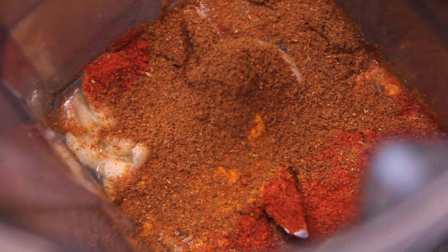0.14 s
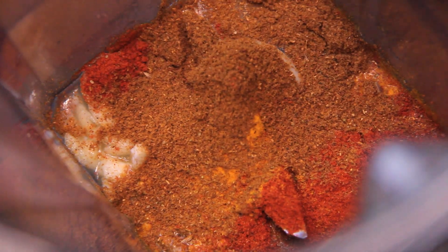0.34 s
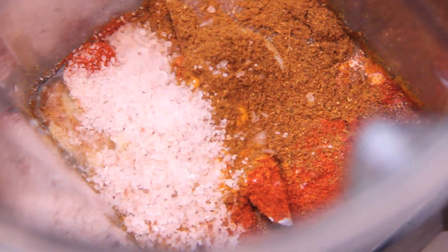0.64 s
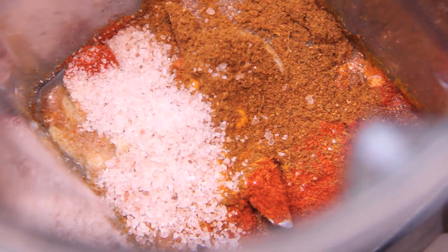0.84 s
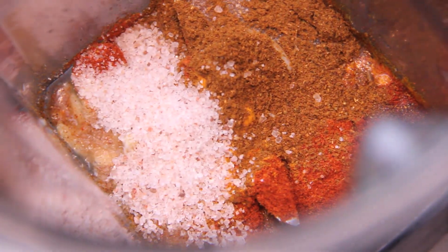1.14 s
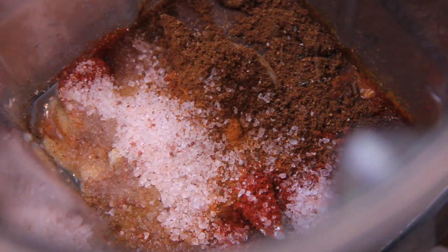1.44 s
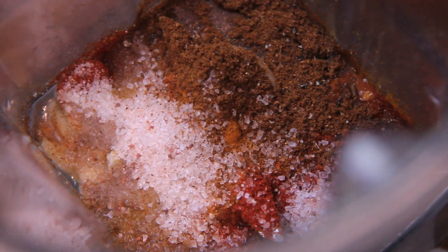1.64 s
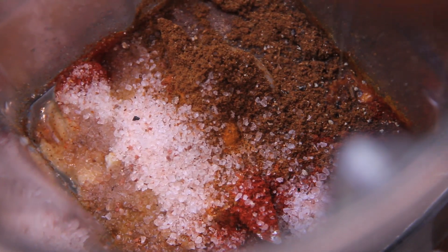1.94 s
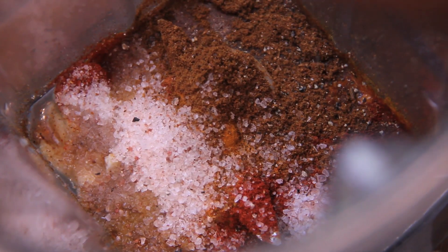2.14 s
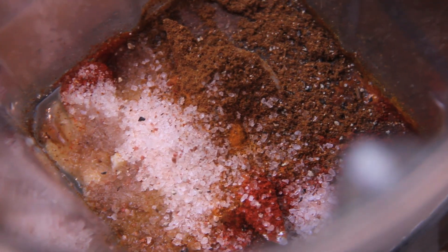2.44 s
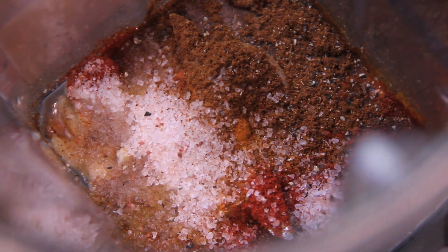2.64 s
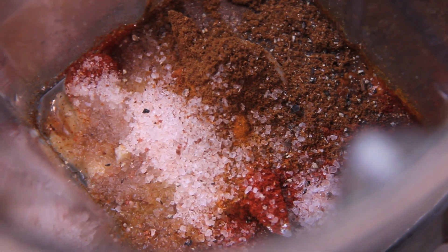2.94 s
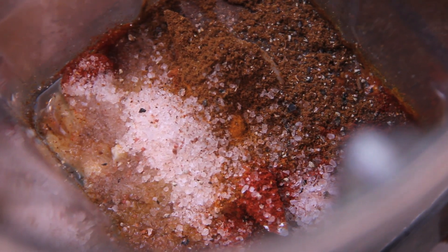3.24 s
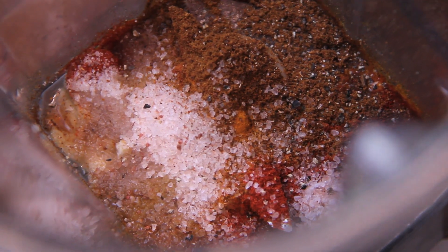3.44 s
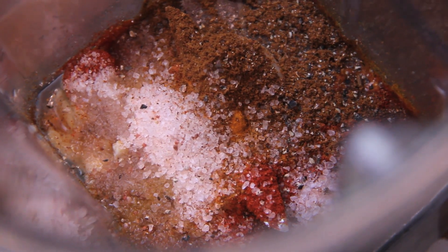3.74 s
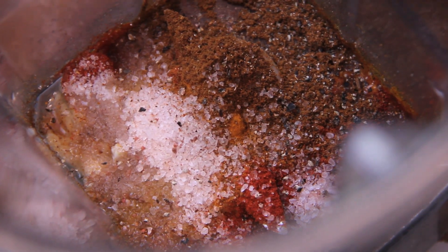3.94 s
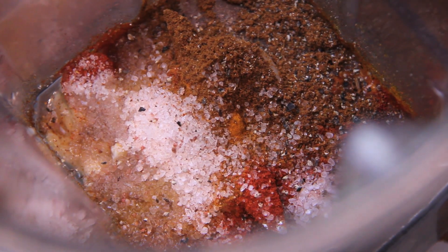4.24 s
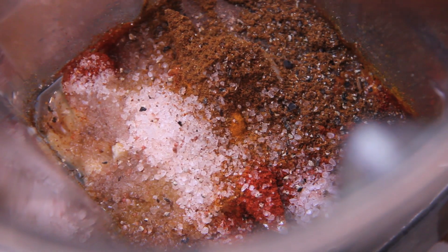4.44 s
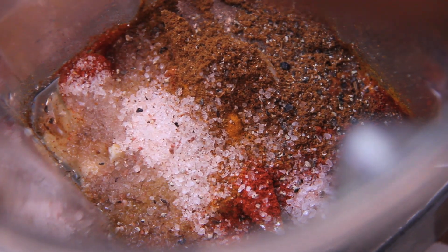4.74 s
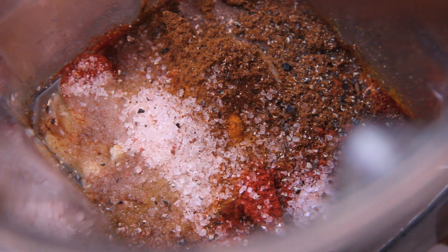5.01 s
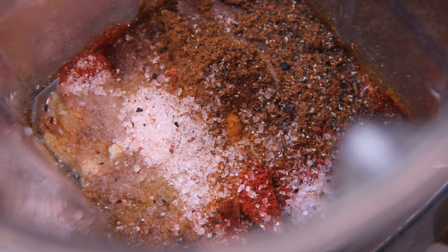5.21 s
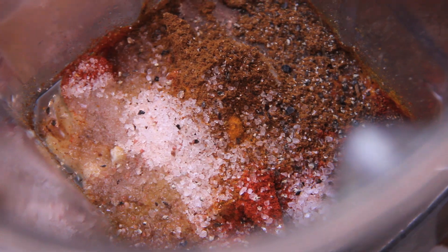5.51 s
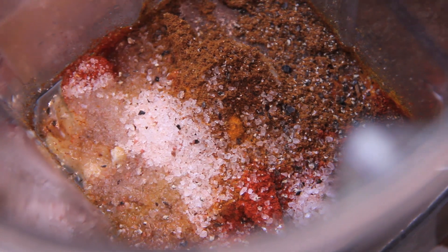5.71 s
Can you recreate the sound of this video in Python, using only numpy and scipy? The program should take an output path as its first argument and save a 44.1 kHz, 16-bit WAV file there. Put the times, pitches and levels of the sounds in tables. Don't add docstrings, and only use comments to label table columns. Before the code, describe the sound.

Close kitchen sounds over quiet, low room noise and a faint appliance hum. A fading glass ring opens, then a spoon taps the half-filled jar at 0.1 s and harder at 0.27 s, each a click followed by a short, dull glassy ring. A hard cut at 0.4 s leads to salt sliding off with a soft hiss around 0.55 s and a small tick at 0.6 s. Around 0.92-1.06 s a metal spoon scrapes and rattles in a bright cluster, ringing thinly. At 1.4 s another abrupt cut brings a much louder hand pepper mill. It grinds until the end near 6 s in short twists, roughly every 0.3 s: gritty crunch, sharp irregular cracks, high flying ticks and low knocks, with brief lulls and soft hand thuds. A faint shaft squeak appears near 3.1 s; the strongest cracks come around 3.8-4.4 s and 5.77 s, with a heavier thud then.

```python
import sys
import numpy as np
from scipy import signal
from scipy.fft import rfft, irfft, next_fast_len
from scipy.io import wavfile
from scipy.ndimage import uniform_filter1d

SR = 44100
rng = np.random.default_rng(int(sys.argv[2]) if len(sys.argv) > 2 else 0)


def transcribe(u):
    v = np.clip(np.atleast_2d(u).T, -1, 1)
    q = np.round(v * 32767).astype(np.int16)
    wavfile.write(sys.argv[1], SR, q)


def volts_from_db(level):
    exponent = np.asarray(level, float) / 20
    return 10 ** exponent


N = 258867
T = np.arange(N) / SR
CUTS_S = (0.405, 1.407)


def unit(x):
    return x / np.sqrt(np.mean(x ** 2) + 1e-20)


def power_db(power):
    return 10 * np.log10(power)


def along(points, hz):
    point_hz, value = np.transpose(points)
    return np.interp(np.log(hz + 1), np.log(point_hz + 1), value)


def curves(rows):
    s, *columns = np.transpose(rows)
    return [np.interp(T, s, column, left=-150, right=-150) for column in columns]


def coloured(x, spectrum, peaks=(), lift_db=0):
    size = 2 * next_fast_len(N // 2 + 4096)
    f = np.fft.rfftfreq(size, 1 / SR)
    bumps = 0
    for hz, width_hz, db in peaks:
        bumps = bumps + volts_from_db(lift_db + db / 2) * width_hz ** 2 / (4 * (f - hz) ** 2 + width_hz ** 2)
    gain = unit(volts_from_db(along(spectrum, f)) * (1 + bumps))
    cepstrum = irfft(np.log(gain + 1e-6), size)
    cepstrum[1:size // 2] *= 2
    cepstrum[size // 2 + 1:] = 0
    return irfft(rfft(x, size) * np.exp(rfft(cepstrum)), size)[:N]


def grit(rate_hz, spread_db, life_ms, smooth):
    size = volts_from_db(spread_db * np.minimum(rng.exponential(size=N), 4))
    hits = (rng.random(N) < rate_hz / SR) * size
    puffs = signal.lfilter([1], [1, -np.exp(-1000 / (life_ms * SR))], hits)
    return unit((unit(puffs) + smooth) * rng.standard_normal(N))


def bursts(times_s, dbs, hold_ms, fall_ms, rise_ms=0.095, spike=0):
    out = np.zeros(N + SR)
    ms = np.arange(SR // 20) * 1000 / SR
    for s, db, hold, rise in np.broadcast(times_s, dbs, hold_ms, rise_ms):
        shape = np.exp(-ms / hold) * np.exp(-np.maximum(ms - hold, 0) / fall_ms)
        shape *= (1 - np.exp(-ms / rise)) * (1 + spike * np.exp(-ms / 0.26))
        out[round(s * SR):][:len(ms)] += volts_from_db(db) * shape * rng.standard_normal(len(ms))
    return out[:N]


def pushes(times_s, dbs):
    out = np.zeros(N)
    out[np.round(times_s * SR).astype(int)] = volts_from_db(dbs)
    return out


def pings(rows, cycles, rough, band_hz):
    out = np.zeros(N + SR)
    t = np.arange(SR // 50) / SR
    for s, db, hz in rows:
        wave = np.sin(2 * np.pi * hz * t) + rough * rng.standard_normal(len(t))
        shape = np.exp(-hz * t / cycles) * (1 - np.exp(-4 * hz * t))
        out[round(s * SR):][:len(t)] += volts_from_db(db) * wave * shape
    return signal.sosfilt(signal.butter(2, band_hz, "bandpass", fs=SR, output="sos"), out[:N])


# (frequency [Hz], t60 [s])
KITCHEN_DECAY = [(200, 0.54), (1000, 0.53), (4000, 0.4), (12000, 0.14)]


def room(x, near_db=12, lead=90):
    out, step = np.zeros(N + 2 * SR), SR // 4
    for i in range(0, N, step):
        hz, t, z = signal.stft(rng.standard_normal(SR // 2), SR, nperseg=256)
        decay = volts_from_db(-60 * t / along(KITCHEN_DECAY, hz)[:, None])
        tail = signal.istft(z * decay, SR, nperseg=256)[1]
        tail *= volts_from_db(near_db * np.exp(-np.arange(len(tail)) / (0.011 * SR)))
        wet = signal.fftconvolve(x[i:i + step], tail / np.linalg.norm(tail))
        out[i + int(lead):][:len(wet)] += wet
    return out[:N]


# (frequency [Hz], density [dB/Hz])
FLOOR_SPECTRUM = [(13, -95), (22, -26), (70, -1), (109, -2.5), (174, -6.5), (194, -1), (347, -4.5),
                  (524, -9.5), (618, -12.5), (1200, -13.5), (1970, -19.5), (6810, -23), (16000, -34.5)]
# (frequency [Hz], level [dB rms])
HUM_TONES = [(209.9, -72.5), (296.1, -71), (484.5, -80), (1200, -77.5)]


def air():
    hum = 0
    for hz, db in HUM_TONES:
        wander = np.cumsum(rng.normal(0, 0.0088, N))
        hum = hum + volts_from_db(db + 1.5) * np.sin(2 * np.pi * hz * T + wander)
    return volts_from_db(-63) * coloured(rng.standard_normal(N), FLOOR_SPECTRUM) + hum


# (time [s], ring level [dB], click level [dB])
SPOON_TAPS = [
    (-.05, -11, -25.5),
    (0.108, -11, -22.5),
    (0.2652, -6.5, -19.5),
]
# (frequency [Hz], level [dB], t60 [s])
JAR_MODES = [(166.7, -32.5, 0.19), (435, -17.5, 0.2), (503, -18, 0.059), (531, -2.5, 0.061),
             (600, -4, 0.034), (666, -14.5, 0.085), (724, -20, 0.11), (1024, -18.5, 0.077),
             (1503, -14, 0.045), (1724, -17.5, .08), (2210, -15, 0.033), (2390, -21, .035)]
# (frequency [Hz], density [dB/Hz])
CLICK_SPECTRUM = [(410, -35), (700, -7.5), (952, -14.5), (1470, -4.5), (2200, -6), (3220, -12), (3850, -22),
                  (4600, -11), (7130, -24.5), (9700, -29.5), (15000, -49)]


def jar():
    early_s = 0.1
    s, ring_db, click_db = np.transpose(SPOON_TAPS)
    click = bursts(s + early_s, click_db + 2.5, hold_ms=7, fall_ms=4.9, rise_ms=0.83)
    click = coloured(click, CLICK_SPECTRUM)
    ring = np.zeros(N)
    for at, db in zip(s + early_s + 0.00221, ring_db):
        t = np.maximum(T - at, 0)
        onset = 1 - np.exp(-t / 0.0044)
        for hz, level_db, t60_s in JAR_MODES:
            ring += volts_from_db(db + level_db - 60 * t / t60_s) * np.sin(2 * np.pi * hz * t) * onset
    out = click + volts_from_db(-11) * room(click, near_db=7) + ring + volts_from_db(-10) * room(ring, near_db=11.5)
    return np.roll(out, -round(early_s * SR))


# (time [s], level [dB])
SALT_LEVEL = [(.52, -77), (.535, -66), (.545, -53), (.578, -59), (.59, -59), (.63, -69), (.72, -76)]
# (frequency [Hz], density [dB/Hz])
SALT_SPECTRUM = [(410, -54), (700, -9), (1230, -8), (2630, -5), (3790, -9), (8880, -9), (16000, -15)]


def salt_hiss():
    grains = grit(4000, 3.6, 0.35, 1.2)
    return coloured(volts_from_db(curves(SALT_LEVEL)[0]) * grains, SALT_SPECTRUM)


# (time [s], peak level [dB])
SPOON_TICKS = [(0.6, -32), (.716, -46), (0.916, -38), (0.9228, -21.5), (0.941, -30), (0.9438, -30),
               (.9465, -33), (0.9501, -25), (.9592, -24), (.9663, -26), (.972, -34), (0.9755, -27),
               (1.006, -29), (1.031, -45), (1.0605, -35)]
# (frequency [Hz], width [Hz], level [dB])
BOWL_MODES = [(6370, 91, 0), (7000, 110, -9), (4120, 120, -8)]
# (frequency [Hz], density [dB/Hz])
DUST_SPECTRUM = [(2500, -38.5), (4500, -5), (6500, 3.5), (9000, 2), (11000, -5.5), (15000, -19),
                 (18000, -40)]


def spoon_ticks():
    s, db = np.transpose(SPOON_TICKS)
    contacts = bursts(s, db - 4.5, hold_ms=0.5, fall_ms=0.6)
    return coloured(contacts, DUST_SPECTRUM, BOWL_MODES, lift_db=18)


# (time [s], peak level [dB])
SPOON_SLIPS = [(.6, -40), (.9155, -41), (.923, -26), (.9411, -25), (.9439, -25), (.9466, -25), (.9503, -24),
               (.9593, -22), (.9617, -31), (.9664, -27), (.9721, -28), (.976, -32), (.9798, -33),
               (1.0067, -35), (1.0605, -41)]


def spoon_slips():
    jolts = -np.convolve(pushes(*np.transpose(SPOON_SLIPS)), np.hanning(15))[:N]
    return jolts - uniform_filter1d(jolts, size=60, origin=25)


# (time [s], level [dB])
RUB_LEVEL = [(.86, -77), (.91, -67), (.925, -44), (.938, -50), (.95, -36.5), (.98, -41.5), (1.055, -51),
             (1.068, -47), (1.15, -75)]
# (frequency [Hz], density [dB/Hz])
SCRAPE_SPECTRUM = [(350, -44), (650, -4), (1250, 3.5), (2200, -4), (3200, -14), (5100, -16), (6600, -12.5),
                   (9400, -20), (16000, -29)]
# (frequency [Hz], width [Hz], level [dB])
HANDLE_MODES = [(10170, 120, 0), (10470, 260, -5), (15400, 100, -14)]


def spoon_scrape():
    rub_db, = curves(RUB_LEVEL)
    ring_db = 1.6 * np.roll(rub_db, round(0.025 * SR)) + 8
    brush_s = 0.862
    brush_db = np.where(T > brush_s, -71 - 90 * (T - brush_s), -150)
    ring_db = np.maximum(ring_db, brush_db)
    rub = coloured(volts_from_db(rub_db - 3) * grit(1200, 2.6, 0.8, 0.5), SCRAPE_SPECTRUM, BOWL_MODES, lift_db=9.5)
    ring = volts_from_db(ring_db + 1.5) * grit(500, 1.6, 0.9, 0.8)
    return rub + coloured(ring, SALT_SPECTRUM, HANDLE_MODES, lift_db=28)


def salt():
    dry = salt_hiss() + spoon_ticks() + spoon_slips() + spoon_scrape()
    return dry + volts_from_db(-10) * room(dry)


# (start [s], rise [s], length [s], effort [dB], last squeeze [dB])
TWISTS = [(1.338, 0.02, 0.22, -31, 3), (1.626, 0.15, 0.24, -33.5, 3), (1.962, 0.021, 0.2, -34, 8.5),
          (2.226, 0.1, .26, -34, 3.5), (2.571, 0.069, 0.2, -33.5, 7.5), (2.857, 0.024, 0.18, -32.5, 2.5),
          (3.101, 0.056, 0.23, -35.5, 6.5), (3.38, 0.07, 0.24, -33, 3.5), (3.653, 0.083, 0.24, -34, 2.5),
          (3.996, 0.0064, 0.18, -31, -3), (4.239, 0.049, 0.23, -35.5, 4), (4.552, 0.015, .22, -33, 4.5),
          (4.841, 0.05, 0.21, -36, 7), (5.1, 0.056, 0.21, -31, 6), (5.334, 0.051, 0.26, -33.5, 4),
          (5.628, 0.056, 0.25, -35, -3)]
# (time [s], level [dB])
BURR_BITES = [(1.49, -33.5), (1.783, -34), (2.06, -35), (2.337, -45.5), (2.635, -39.5), (2.915, -39.5),
              (3.234, -34.5), (3.49, -36.5), (3.775, -38.5), (4.08, -40), (4.38, -39.5), (4.631, -34),
              (4.912, -36), (5.18, -38.5), (5.467, -36), (5.79, -40)]


def twist_levels():
    start, rise, length, effort_db, squeeze_db = np.transpose(TWISTS)[..., None]
    start_db, fall_db_per_s, sag_db_per_s = -19.5, 261, 20
    squeeze_s, squeeze_lead_s = 0.023, 0.014
    since_stop = T - start - length
    drive_db = effort_db + start_db * np.clip(1 - (T - start) / rise, 0, 9)
    drive_db = drive_db - fall_db_per_s * np.maximum(since_stop, 0)
    squeeze_db = squeeze_db * np.exp(-0.5 * ((since_stop + squeeze_lead_s) / squeeze_s) ** 2)
    coarse_db = drive_db - sag_db_per_s * np.clip(T - start - rise, 0, length)
    s, db = np.transpose(BURR_BITES)[..., None]
    away_db = np.maximum(245 * (s - T), 207 * (T - s))
    bite_power = (volts_from_db(db - away_db) ** 2).sum(0)

    def mix(twist_db, bite_db, rest_db):
        power = (volts_from_db(twist_db) ** 2).sum(0) + volts_from_db(bite_db) ** 2 * bite_power
        return power_db(power + volts_from_db(-51 + rest_db) ** 2)

    body_db = mix(1.18 * coarse_db - 16.5, -0.3, -12)
    crush_db = mix(coarse_db + 0.28 + 0.63 * squeeze_db, 3.7, 0.33)
    dust_db = mix(drive_db + 1.5 + squeeze_db, 5.7, -2.9)
    return body_db, crush_db, dust_db


# (frequency [Hz], density [dB/Hz])
BODY_SPECTRUM = [(200, -21), (450, -12), (800, 5.5), (1500, 6), (2200, -52), (4000, -14)]
# (frequency [Hz], density [dB/Hz])
CRUSH_SPECTRUM = [(900, -13), (1600, 2), (2500, 9), (4500, 11.5), (6000, -3.5), (10000, -24)]


def grinding(body_db, crush_db, dust_db):
    coarse = grit(700, 3.3, 1.0, 0.17)
    fine = grit(2100, 4, 0.27, 0.42)
    chips = grit(260, 3, 0.25, 0.05)
    slope_db_per_s = uniform_filter1d(np.gradient(crush_db) * SR, size=900)
    biting = np.clip(slope_db_per_s / 150, 0.15, 1)
    out = coloured(volts_from_db(body_db - 4.5) * coarse, BODY_SPECTRUM)
    out += coloured(volts_from_db(crush_db - 3.5) * (0.45 * coarse + 0.79 * fine), CRUSH_SPECTRUM)
    out += coloured(volts_from_db(dust_db - 2.5) * (0.34 * coarse + 0.83 * fine), DUST_SPECTRUM)
    return out + coloured(volts_from_db(crush_db - 4.5) * biting * chips, DUST_SPECTRUM)


# (time [s], peak level [dB])
REGRIPS = [(1.398, -34), (1.678, -36), (1.983, -40), (2.615, -61), (2.852, -32), (3.227, -58), (3.414, -41),
           (3.482, -68), (3.987, -32), (4.282, -34.5), (4.367, -45), (4.554, -37.5), (4.848, -30.5),
           (5.111, -36.5), (5.768, -18)]
# (frequency [Hz], density [dB/Hz])
THUD_SPECTRUM = [(30, -20), (70, -9), (130, 0), (300, -1.5), (600, -4), (1500, -34), (6000, -62)]


def hand_thuds():
    s, db = np.transpose(REGRIPS)
    soft = np.convolve(pushes(s + 0.00648, db - 19.5), np.hanning(70))[:N]
    return coloured(soft, THUD_SPECTRUM)


# (time [s], level [dB], pitch [Hz])
SHARDS = [(1.4157, -15, 5400), (1.462, -14, 5300), (1.5067, -21, 6600), (1.5285, -10, 4800),
          (1.5337, -19, 5700), (1.783, -10, 5740), (1.815, -17, 5800), (1.9655, -31, 5400),
          (2.0793, -19, 6900), (2.125, -16, 5270), (2.1577, -13, 7200), (2.2633, -37, 6470),
          (2.3485, -26, 5500), (2.439, -6, 8300), (2.5608, -25, 6100), (2.5954, -29, 5200),
          (2.7823, -8, 6600), (3.0003, -18, 6000), (3.2045, -9, 6570), (3.3397, -9, 7600),
          (3.4039, -29, 8200), (3.4415, -23, 7400), (3.4941, -16, 5900), (3.5362, -20, 5600),
          (3.5555, -1, 4330), (3.5921, -24, 6800), (3.609, -20, 7000), (3.7211, -28, 6000),
          (3.8037, -16, 4370), (4.0098, -24, 6000), (4.0241, -10, 5100), (4.1143, -16, 6800),
          (4.1716, -11, 6960), (4.3038, -29, 7200), (4.3359, -16, 4800), (4.3771, -16, 6000),
          (4.4381, -24, 7000), (4.4579, -19, 6840), (4.463, -16, 6400), (4.4779, -25, 7800),
          (4.6115, -9, 6200), (4.6494, -19, 4460), (4.6629, -24, 4100), (4.7629, -13, 7100),
          (4.909, -18, 8200), (4.9168, -2, 4640), (5.014, -18, 6800), (5.1244, -31, 6300),
          (5.1341, -27, 6940), (5.1871, -9, 4700), (5.3098, -15, 6300), (5.3796, -17, 8140),
          (5.4023, -26, 6300), (5.4363, -14, 7500), (5.5201, -18, 5400), (5.5498, -22, 8100),
          (5.564, -15, 5300), (5.7701, -16, 4700), (5.7994, -16, 4480), (5.8127, -16, 5900)]
# (time [s], level [dB], pitch [Hz])
INNER_KNOCKS = [(1.462, -44, 905), (1.993, -38.5, 940), (2.348, -34, 840), (2.527, -33.5, 1120),
                (3.12, -41, 910), (3.374, -38, 900), (3.4865, -26, 900), (3.551, -41, 1800),
                (3.771, -39, 790), (4.0675, -26.5, 572), (4.372, -18.5, 850), (3.976, -42, 700),
                (4.832, -43, 750), (4.843, -45, 850), (4.855, -33, 1410), (5.249, -41.5, 806),
                (5.359, -42, 800), (5.504, -27.5, 900), (5.635, -50, 600), (5.727, -33, 1050),
                (5.811, -22, 1230)]


def shards_and_knocks():
    high = pings(SHARDS, cycles=1.3, rough=0.31, band_hz=(2800, 10500))
    low = pings(INNER_KNOCKS, cycles=1.23, rough=0.37, band_hz=(450, 2600))
    return volts_from_db(2.5) * high + volts_from_db(5) * low


# (time [s], snap level [dB], knock level [dB], length [ms])
WHOLE_CORNS = [(1.481, -6, -17.5, 3.5), (1.4855, -22, -18.5, 3.5), (1.5283, -14, -25, 9.5),
               (1.532, -16, -31, 2.3), (1.783, -23, -26, 3.4), (2.0773, -23, -32, 3),
               (2.335, -27, -29.5, 3.8), (2.3943, -21.5, -31, 6.6), (2.6254, -6, -13, 3.8),
               (2.9058, -20.5, -19.5, 4.1), (2.93, -16.5, -25, 6.2), (3.2309, -9.5, -14, 1.2),
               (3.2436, -3.5, -14, 3.2), (3.4859, -5.5, -14.5, 6.6), (3.501, -20, -48, 2.9),
               (3.535, -14, -27, 3.9), (3.5499, -4, -16.5, 5.7), (3.7717, -19, -23, 2.6),
               (3.783, -0.5, -13, 2.45), (4.0669, -0.5, -15.5, 2.4), (4.079, -24, -25, 4.9),
               (4.336, 2.5, -17.5, 0.37), (4.3718, -4.5, -13, 2.1), (4.405, -10.5, -25, 3.1),
               (4.6566, -9.5, -21.5, 4.1), (4.9163, -7.5, -19.5, 2.3), (5.1704, -14.5, -23, 3.7),
               (5.4536, -15, -22.5, 4.5), (5.4725, -16, -24.5, 3.5), (5.7745, 1.5, -8, 2.23)]
# (time [s], snap level [dB], length [ms])
LARGE_CRUMBS = [(1.653, -31, 2.1), (1.8387, -18.5, 3.5), (1.98, -29, 4.3), (2.0237, -20.5, 2.5),
                (2.1578, -20, 3), (2.4686, -20.5, 3.9), (2.5557, -25.5, 2.3), (2.745, -18, 1.8),
                (2.7803, -15.5, 4), (3.033, -13, 1.6), (3.0588, -14.5, 0.87), (3.159, -20, 1.5),
                (3.297, -16, 1.2), (3.3409, -16, 1.6), (3.4362, -26, 4.1), (3.605, -15.5, 7.7),
                (3.8994, -19, 1.8), (4.0085, -19, 12), (4.1141, -32, 1.1), (4.1715, -17, 3.5),
                (4.3138, -23, 8.3), (4.573, -22, 2), (4.7503, -17.5, 9.7), (5.0304, -18.5, 2.9),
                (5.187, -17.5, 3.4), (5.3037, -14, 2.7), (5.5489, -19.5, 13), (5.5815, -16, 1.7),
                (5.7413, -17.5, 2), (5.7983, -16.5, 2.6)]
# (time [s], snap level [dB])
SLACK_TICKS = [(1.733, -29), (1.8983, -23), (1.965, -38), (2.2489, -34), (2.256, -28), (2.2631, -27),
               (2.277, -29), (2.3475, -30), (2.486, -27), (2.5663, -20), (2.5951, -30), (2.8126, -23),
               (3.404, -34), (3.691, -25), (3.7084, -30), (4.2823, -27), (4.4385, -22), (4.722, -18),
               (4.8976, -15), (5.1241, -33), (5.1338, -29), (5.375, -20), (5.502, -26), (5.653, -22),
               (5.699, -25)]


def breaks(crush_db, count=60):
    when, loud, span = rng.random((count, 3)).T
    when = CUTS_S[1] + when * (T[-1] - CUTS_S[1])
    stray_db = np.interp(when, T, crush_db) - 3 + 8 * loud
    strays = np.transpose([when, stray_db, 1.2 * (0.7 + span)])
    ticks = [(s, db, 1.15) for s, db in SLACK_TICKS]
    s, snap_db, hold_ms = np.vstack([LARGE_CRUMBS, ticks, strays]).T
    crumbs = [s, snap_db, snap_db - 24, hold_ms]
    return np.hstack([np.transpose(WHOLE_CORNS), crumbs])


# (frequency [Hz], density [dB/Hz])
SNAP_SPECTRUM = [(1200, -46.5), (2200, -3), (4500, 1.5), (7000, -1), (9500, -11), (13000, -13),
                 (18000, -8.5)]
# (frequency [Hz], width [Hz], level [dB])
MILL_MODES = [(2770, 650, -12), (4510, 420, 9), (6100, 260, -4)]
# (frequency [Hz], density [dB/Hz])
KNOCK_SPECTRUM = [(60, -22.5), (300, -15.5), (600, -0.5), (1200, 7.5), (2200, 6), (3500, -13.5),
                  (6000, -54.5), (16000, -57)]


def cracks(crush_db):
    s, snap_db, knock_db, hold_ms = breaks(crush_db)
    whole = np.clip((knock_db - snap_db + 30.5) / 13, 0.05, 0.95)
    snap = bursts(s, power_db(whole) + snap_db - 3.5, 0.68 * hold_ms, fall_ms=13, spike=1)
    fizz_db = power_db(1 - whole) + snap_db + 2.5
    fizz = bursts(s, fizz_db, 1.22 * hold_ms, fall_ms=11, rise_ms=0.57 * hold_ms)
    knock = bursts(s, knock_db - 2, hold_ms, fall_ms=9.6, spike=0.81) + pushes(s, knock_db + 6)
    out = coloured(snap, SNAP_SPECTRUM, MILL_MODES, lift_db=-2.5)
    return out + coloured(fizz, DUST_SPECTRUM) + coloured(knock, KNOCK_SPECTRUM)


# (time [s], pitch [Hz], level [dB])
SHAFT_SQUEAK = [(3.065, 940, -70), (3.076, 933, -61), (3.12, 935, -57), (3.185, 935, -54), (3.2, 935, -64)]


def squeak():
    pitch_hz, db = curves(SHAFT_SQUEAK)
    wander = np.cumsum(rng.normal(0, 0.0373, N))
    return volts_from_db(db + 3) * np.sin(2 * np.pi * np.cumsum(pitch_hz) / SR + wander)


def mill():
    body_db, crush_db, dust_db = twist_levels()
    grind = grinding(body_db, crush_db, dust_db)
    crack = cracks(crush_db) + shards_and_knocks()
    wet = volts_from_db(-6) * room(grind, near_db=34) + volts_from_db(-6) * room(crack, near_db=14)
    return grind + crack + wet + hand_thuds() + squeak()


def scene():
    first, third = T < CUTS_S[0], T >= CUTS_S[1]
    second = ~first & ~third
    return (air() + jar() * first + salt() * second + mill() * third)[None]


def roll_off(x):
    return signal.sosfilt(signal.butter(12, 16470, fs=SR, output="sos"), x)


def record(dry):
    dry = signal.sosfiltfilt(signal.butter(24, 15750, fs=SR, output="sos"), dry)
    mix = dry / (1 + np.abs(dry) ** 20) ** (1 / 20)
    return roll_off(mix)


dry = scene()
out = record(dry)
transcribe(out)
```